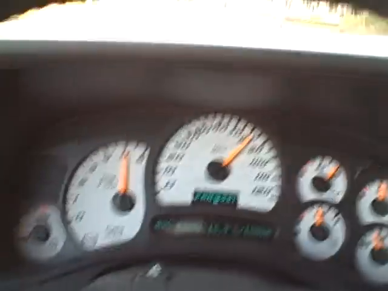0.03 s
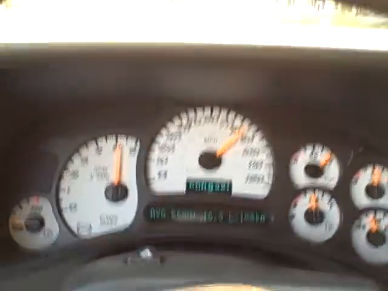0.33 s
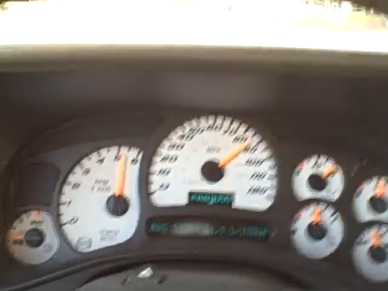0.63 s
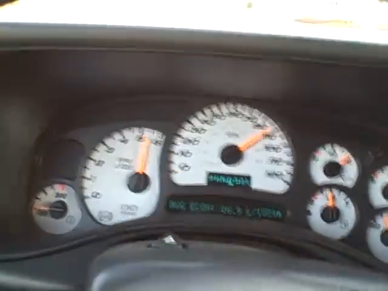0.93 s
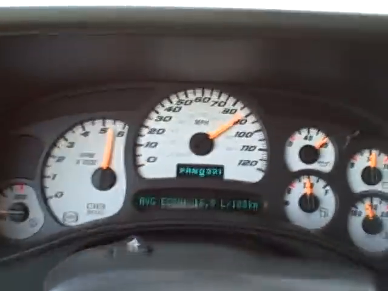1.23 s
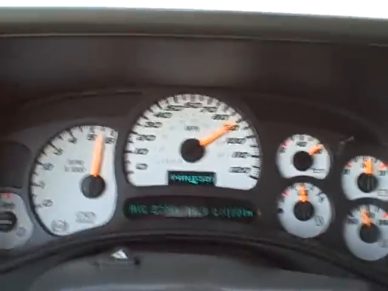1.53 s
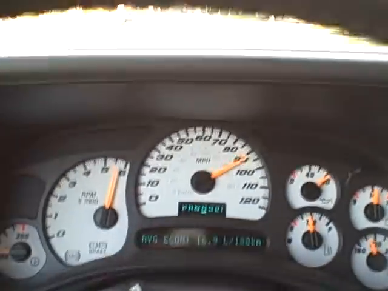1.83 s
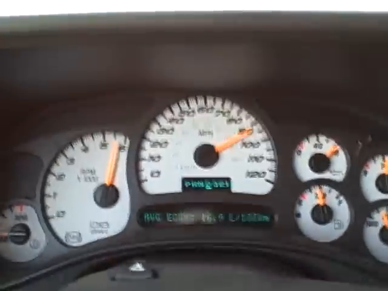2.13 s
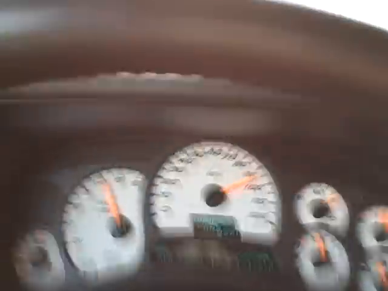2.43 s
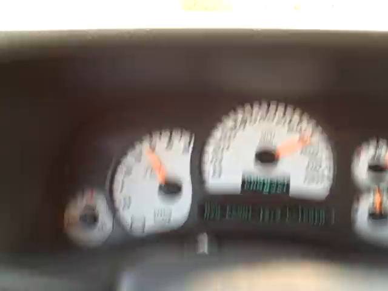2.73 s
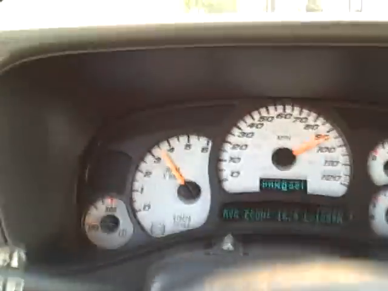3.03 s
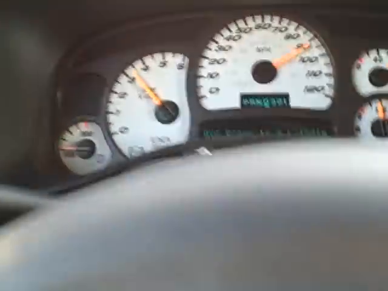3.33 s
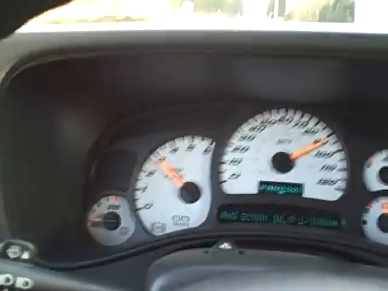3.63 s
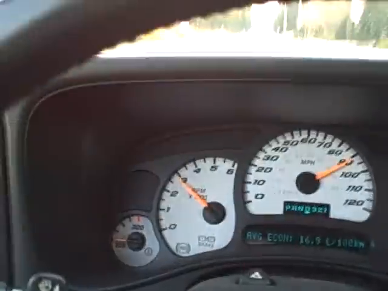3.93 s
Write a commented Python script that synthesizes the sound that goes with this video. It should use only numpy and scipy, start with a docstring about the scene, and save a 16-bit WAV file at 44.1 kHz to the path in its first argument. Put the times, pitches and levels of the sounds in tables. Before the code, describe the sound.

A truck engine roars at full throttle, then a blow-off valve hisses as the revs fall.

```python
"""Inside the cab of a V8 truck on a fast road. At full throttle, exhaust tones climb over a rasping
roar of firing pulses and gas noise, with shaft hum and turbo hiss. Near 2.2 s the throttle lifts:
a blow-off valve whistles, its air flutters away and the revs fall. Cab boom, wheel shake and tyre
noise carry on, and bumps shake the trim. Throughout, the bass drives a small recorder into its ceiling."""
import sys
import numpy as np
from scipy import signal
from scipy.fft import rfft, irfft
from scipy.io import wavfile

SR = 44100
rng = np.random.default_rng(int(sys.argv[2]) if len(sys.argv) > 2 else 0)


def inscribe(sig):
    """Save sig as 16-bit PCM at rate SR to the path in sys.argv[1].

    A 1-D sig is mono; a 2-D sig holds one channel per row.
    Samples are clipped to [-1, 1] before scaling.
    """
    pcm = np.round(np.clip(np.atleast_2d(sig).T, -1, 1) * 32767)
    wavfile.write(sys.argv[1], SR, pcm.astype(np.int16))


N = 176400
T = np.arange(N) / SR


def amp(db):
    """Decibels to gain."""
    return 10 ** (np.asarray(db) / 20)


def unit(x):
    """Scale to rms 1."""
    return x / np.sqrt(np.mean(x ** 2) + 1e-20)


def curve(rows, column=1):
    """One column of a timed table, at every sample."""
    rows = np.array(rows, float)
    return np.interp(T, rows[:, 0], rows[:, column])


def bell(centre_s, half_width_s):
    """Gaussian envelope, peak 1."""
    return np.exp(-((T - centre_s) / half_width_s) ** 2)


def colour(x, spectrum):
    """Filter by rows of freq_hz, gain_db; rms 1."""
    hz, db = np.transpose(spectrum)
    bins_hz = np.fft.rfftfreq(N, 1 / SR)
    gain = amp(np.interp(np.log(bins_hz + 1), np.log(hz + 1), db)) * (bins_hz > 0)
    return unit(irfft(rfft(x) * gain, N))


def noise(spectrum):
    """Coloured noise, rms 1."""
    return colour(rng.standard_normal(N), spectrum)


def wander(rate_hz):
    """Smooth random drift up to about rate_hz, rms 1."""
    bins_hz = np.fft.rfftfreq(N, 1 / SR)
    return unit(irfft(rfft(rng.standard_normal(N)) * np.exp(-(bins_hz / rate_hz) ** 2), N))


def sine(turns):
    """Tone with random start phase, rms 1."""
    return np.sqrt(2) * np.sin(2 * np.pi * (turns + rng.random()))


def exhaust(cycle_hz, cycles):
    """Wavering multiples of the engine cycle rate; their balance shifts with the revs."""
    # exhaust tones: order, low_rev_db, high_rev_db
    tones = [(2, -28, -28), (3, -30.5, -29.5), (4, -48.5, -28), (5, -42, -29), (6, -41, -35),
             (7, -32, -31.5), (8, -38.5, -39), (9, -50.5, -37), (11, -42, -42), (12, -39, -41),
             (13, -35.5, -35), (14, -40, -38), (15, -39, -40.5), (17, -43, -51), (22, -53, -49),
             (26, -51, -52), (38, -77, -51)]
    # gain of the lower and upper tones: time_s, lower_db, upper_db
    drone = [(0, 3.5, -1.5), (.3, -1.5, 2), (.55, 3, -1.5), (.8, 0.5, -8.5), (1.05, 2.5, -3.5),
             (1.3, 1, 0.5), (1.58, 2, 3.5), (1.85, -3, -2.5), (2.12, 0.5, 0.5), (2.24, 3.5, -5),
             (2.4, -14.5, -23), (4.0, -3.5, -44)]
    # firing tones that swell as the revs fall: order, centre_s, half_width_s, level_db
    swells = [(8, 2.21, 0.024, -22), (4, 2.29, 0.047, -17)]
    low_rev_hz, high_rev_hz = 42, 46.5
    cab_hz, cab_half_width_hz, cab_db = 551.5, 14, 3  # cab resonance
    revs = np.clip((cycle_hz - low_rev_hz) / (high_rev_hz - low_rev_hz), 0, 1)
    lower_db, upper_db = curve(drone), curve(drone, column=2)
    out = np.zeros(N)
    for order, low_rev_db, high_rev_db in tones:
        level_db = low_rev_db + revs * (high_rev_db - low_rev_db)
        level_db += upper_db if order > 10 else lower_db
        resonance_db = cab_db / (1 + ((order * cycle_hz - cab_hz) / cab_half_width_hz) ** 2)
        ragged = max(order - 14, 0)  # high orders break up
        waver_db = (1.8 + .12 * ragged) * wander(rate_hz=12.6)
        drift_turns = .014 * ragged * wander(rate_hz=12)
        out += amp(level_db + resonance_db + waver_db) * sine(order * cycles + drift_turns)
    for order, centre_s, half_width_s, level_db in swells:
        out += amp(level_db) * bell(centre_s, half_width_s) * sine(order * cycles)
    return out


def roar(cycles):
    """Eight uneven cylinders; each firing gives a pulse and a puff of gas noise."""
    # firings of one cycle: gain_db
    cylinders = [-3, -0.5, 0, -1, -2, -4.5, -0.5, -1.5]
    # engine load: time_s, gain_db
    load = [(0, -1.5), (.8, -1), (1.3, 1.1), (2.0, 2), (2.22, -5), (2.37, -4), (2.42, -13.5), (4.0, -13.5)]
    # roar colour: freq_hz, gain_db
    spectrum = [(60, -1.5), (150, 0.5), (330, -1.5), (450, -5), (580, -3.5), (720, -8), (880, -9.5),
                (1050, -6.5), (1300, -11.5), (1650, -15), (2400, -13.5), (3000, -19), (3800, -27.5),
                (6000, -38.5), (15500, -57)]
    base_db, pulse_share, puff_decay_firings, puff_floor = -28, .21, .57, .35
    firings = cycles * len(cylinders)
    count = np.floor(firings).astype(int)
    strength = amp(cylinders)[count % len(cylinders)]
    pulses = unit(strength * np.diff(count, prepend=0))
    pulses = signal.lfilter(*signal.butter(1, 2500, fs=SR), pulses)
    puff_envelope = puff_floor + np.exp(-(firings % 1) / puff_decay_firings)
    puffs = unit(strength * puff_envelope * rng.standard_normal(N))
    rasp = colour(pulse_share * pulses + (1 - pulse_share) * puffs, spectrum)
    return amp(base_db + curve(load)) * rasp


def valve_whistle(age_s):
    """The blow-off whistle sags and frays as pressure drops."""
    # whistle: time_s, pitch_hz, level_db
    whistle = [(2.16, 6850, -60), (2.172, 6780, -27.5), (2.2, 6810, -26), (2.218, 6750, -28),
               (2.231, 6620, -35), (2.273, 6550, -38), (2.295, 6520, -51), (2.33, 6500, -60)]
    turns = np.cumsum(curve(whistle) * (1 + .006 * wander(rate_hz=170))) / SR
    fuzz = (.28 + 6 * age_s) * wander(rate_hz=180) * sine(turns)
    tone = sine(turns) + fuzz + amp(-24) * sine(2 * turns)
    gate = (T > whistle[0][0]) & (T < whistle[-1][0])
    return tone * amp(curve(whistle, column=2)) * gate


def valve_air(age_s):
    """A blast of air, then fluttering hiss; each puff chirps, bending up with the pressure."""
    # blast colour: freq_hz, gain_db
    vent = [(2500, -7), (4500, -5), (5800, -2), (6900, 2), (7800, -0.5), (9300, -5.5), (10400, 2.5),
            (12200, -9), (13600, -6), (15500, -2)]
    # flutter colour: freq_hz, gain_db
    bleed = [(3000, -6), (5000, -0.5), (5800, 1), (7100, -1), (7900, -7), (8500, -2.5), (9200, -8),
             (10700, -6), (12200, -9), (15500, -4.5)]
    attack_s, blast_end_s, release_s = .0062, 2.404, .014
    blast_db, blast_fall_db_per_s = -37, 38
    flutter_db, flutter_fall_db_per_s, flutter_hz, puff_peak_s = -44.5, 10, 12.95, 2.6
    blast = amp(blast_db - blast_fall_db_per_s * age_s) * np.clip((blast_end_s - T) / release_s, 0, 1)
    puff = np.cos(2 * np.pi * flutter_hz * (T - puff_peak_s))
    flutter = amp(flutter_db - flutter_fall_db_per_s * age_s) * (1 + .42 * puff)
    chirp_hz = 6870 * (1 + .041 * puff)
    chirps = amp(-10) * np.maximum(puff, 0) * wander(rate_hz=260) * sine(np.cumsum(chirp_hz) / SR)
    onset = np.minimum(age_s / attack_s, 1)
    return onset * (blast * noise(vent) + flutter * (noise(bleed) + chirps))


def valve_squeaks():
    """Thin, unsteady edge tones in the escaping air."""
    # squeaks: centre_s, half_width_s, pitch_hz, level_db
    squeaks = [(2.328, 0.009, 9300, -48), (2.515, 0.03, 8440, -57)]
    out = np.zeros(N)
    for centre_s, half_width_s, pitch_hz, level_db in squeaks:
        turns = np.cumsum(pitch_hz * (1 + .006 * wander(rate_hz=140))) / SR
        out += amp(level_db) * bell(centre_s, half_width_s) * sine(turns)
    return out


def shaft(cycles):
    """Low hum of a shaft geared to the engine."""
    # hum: time_s, level_db
    hum = [(0, -27.5), (.22, -18), (.45, -23.5), (.8, -18), (1.3, -25.5), (1.8, -26), (2.3, -28),
           (2.6, -45)]
    order, waver_db = 2.67, 2.15
    return amp(curve(hum) + waver_db * wander(rate_hz=9.9)) * sine(order * cycles)


def intake():
    """Air rushing into the turbo."""
    # hiss under boost: time_s, level_db
    boost = [(0, -47.5), (.9, -46.5), (1.4, -43.5), (2.1, -43.5), (2.25, -45.5), (2.45, -57), (3.2, -60.5)]
    # hiss colour: freq_hz, gain_db
    spectrum = [(2500, -9.5), (4800, 4.5), (7000, 2), (9000, -1.5), (10800, -1.5), (11600, -0.5),
                (12400, -1), (15500, -2.5)]
    return amp(curve(boost)) * noise(spectrum)


def wheel_shake():
    """Lumpy throb, twice per wheel turn."""
    # shake strength: time_s, gain_db
    shake = [(0.0, -20), (0.63, -14.5), (0.87, -34), (1.17, -12), (1.44, -20), (2.35, -16.5), (2.41, -6.5),
             (2.52, -25), (2.9, -12), (3.25, -12.5), (3.66, -18), (4.0, -4)]
    start_hz, rise_hz_per_s, drift_hz, base_db = 25.22, .3995, 3, -3
    phase_turns = np.cumsum(start_hz + rise_hz_per_s * T + drift_hz * wander(rate_hz=5.84)) / SR
    lumps = .7 * wander(rate_hz=15)
    return amp(base_db + curve(shake)) * (sine(phase_turns) + lumps * sine(phase_turns))


def cab_boom():
    """Deep road noise in the cab."""
    # boom colour: freq_hz, gain_db
    spectrum = [(5, 8), (12, -1.5), (25, 3), (38, 3.5), (52, -1.5), (70, 1), (88, 0.5), (100, -1),
                (114, 1.5), (135, -2.5), (155, 5.5), (170, -1.5), (184, -4), (205, -11), (260, -26),
                (400, -40)]
    # boom: time_s, level_db
    levels = [(0, -18.5), (.7, -16.5), (2.1, -15), (2.4, -16.5), (2.52, -19), (2.72, -18.5), (2.9, -17),
              (3.25, -17.5), (3.43, -19.5), (3.7, -17), (4.0, -19)]
    return amp(curve(levels)) * noise(spectrum + [(1500, -110)])


def cab_surges():
    """The road sets off low cab resonances in short, rough throbs."""
    # throbs: centre_s, pitch_hz, level_db
    surges = [(0.71, 88, -17), (0.79, 155, -19), (2.63, 153, -16.5), (2.94, 96, -16.5), (2.95, 165, -20),
              (3.17, 152, -16.5), (3.215, 105, -17.5), (3.55, 160, -19), (3.79, 92, -18)]
    out = np.zeros(N)
    for centre_s, pitch_hz, level_db in surges:
        throb = sine(pitch_hz * T) + .35 * wander(rate_hz=25) * sine(pitch_hz * T)
        out += amp(level_db) * bell(centre_s, half_width_s=.036) * throb
    return out


def tyres():
    """Gusty tyre and wind noise."""
    # road noise colour: freq_hz, gain_db
    spectrum = [(120, -34), (200, -7.5), (236, 0.5), (273, -4.5), (437, -11), (497, -15.5), (564, -10.5),
                (890, -19.5), (1260, -18.5), (1680, -26), (4100, -36.5), (6960, -41), (15500, -52)]
    # road noise: time_s, level_db
    levels = [(0, -29.5), (2.3, -30), (2.55, -32.5), (3.15, -32.5), (3.35, -34), (3.6, -33.5), (3.7, -31),
              (4.0, -32.5)]
    rush = signal.sosfilt(signal.butter(2, 170, "high", fs=SR, output="sos"), noise(spectrum))
    gust_db = .8 * wander(rate_hz=30)
    return amp(curve(levels) + gust_db) * unit(rush)


def trim_rattle():
    """Road bumps shake the trim in short, grainy swells."""
    # bumps: centre_s, level_db
    bumps = [(2.385, -40), (2.505, -45), (2.945, -35), (3.05, -43), (3.23, -36), (3.92, -37)]
    # trim colour: freq_hz, gain_db
    spectrum = [(200, -5), (500, 2.5), (800, 0), (1300, -2.5), (2200, -13.5), (4000, -19), (15000, -33)]
    envelope = sum(amp(level_db) * bell(centre_s, half_width_s=.025) for centre_s, level_db in bumps)
    grain_db = 1.6 * wander(rate_hz=150)
    return envelope * amp(grain_db) * noise(spectrum)


def scene():
    """Engine, road and valve from the driver's seat; mono."""
    # engine speed under load: time_s, cycle_hz
    pull = [(0.0, 41.1), (0.05, 41.91), (0.34, 42.12), (0.64, 43.49), (0.88, 43.8), (1.29, 45.27),
            (1.44, 45.28), (1.69, 46.22), (2.06, 46.93), (2.16, 46.21)]
    # engine speed after the lift: time_s, cycle_hz
    coast = [(2.21, 44.28), (2.26, 40.64), (2.35, 38.3), (2.6, 32.99), (4.0, 27.1)]
    speed_jitter, valve_open_s = .0012, 2.165
    cycle_hz = curve(list(pull) + coast)
    cycles = np.cumsum(cycle_hz * (1 + speed_jitter * wander(rate_hz=25))) / SR
    engine = exhaust(cycle_hz, cycles) + roar(cycles) + shaft(cycles) + intake()
    road = wheel_shake() + cab_boom() + tyres() + cab_surges() + trim_rattle()
    valve_age_s = np.maximum(T - valve_open_s, 0)
    valve = valve_whistle(valve_age_s) + valve_air(valve_age_s) + valve_squeaks()
    return (engine + road + valve)[None]


def record(dry):
    """Soft clip, end fades, low-pass."""
    ceiling, knee, fade_s, cutoff_hz = .71, .64, .004, 15750
    headroom = ceiling - knee
    excess = np.maximum(abs(dry) - knee, 0)
    clipped = np.sign(dry) * (np.minimum(abs(dry), knee) + headroom * np.tanh(excess / headroom))
    fade = np.minimum(np.minimum(T, T[-1] - T) / fade_s, 1)
    lowpass = signal.firwin(801, cutoff_hz, window=("kaiser", 9), fs=SR)
    return signal.oaconvolve(clipped * fade, lowpass[None], "same")


dry = scene()
out = record(dry)
inscribe(out)
```